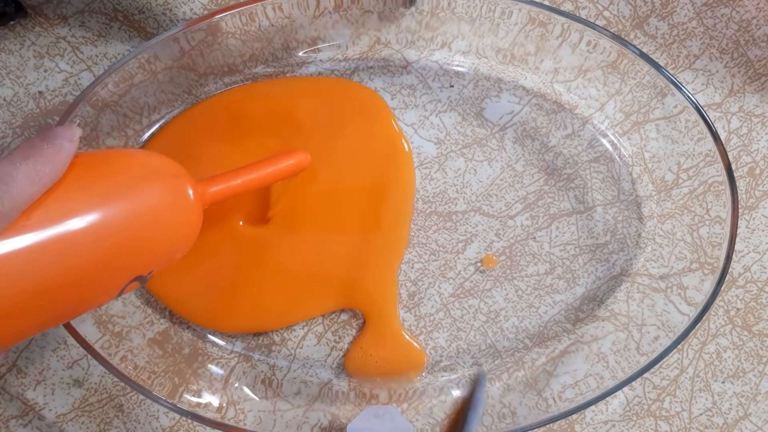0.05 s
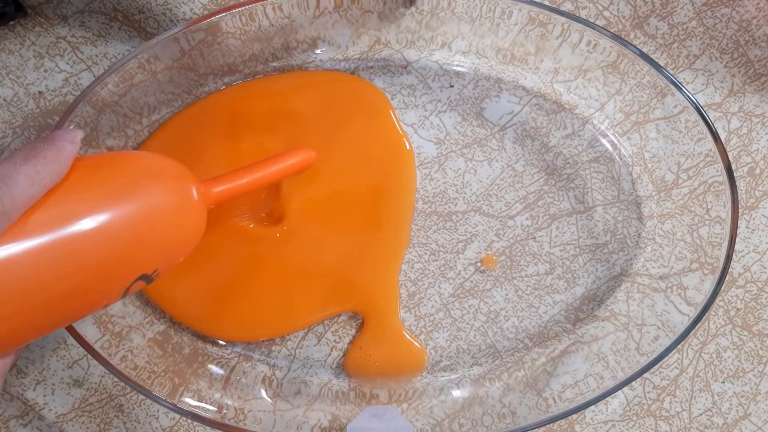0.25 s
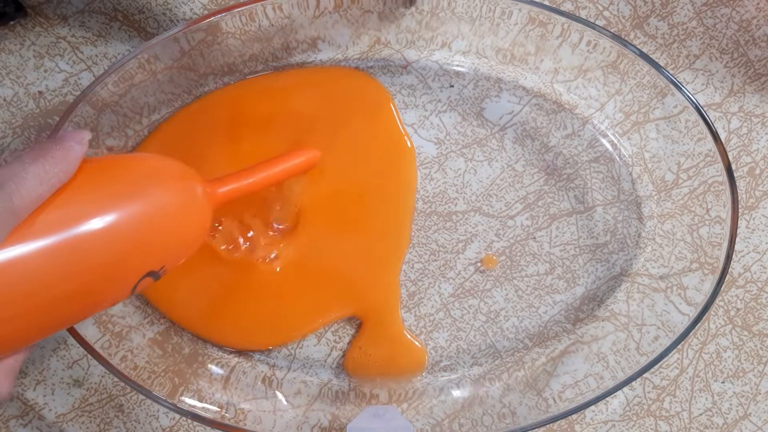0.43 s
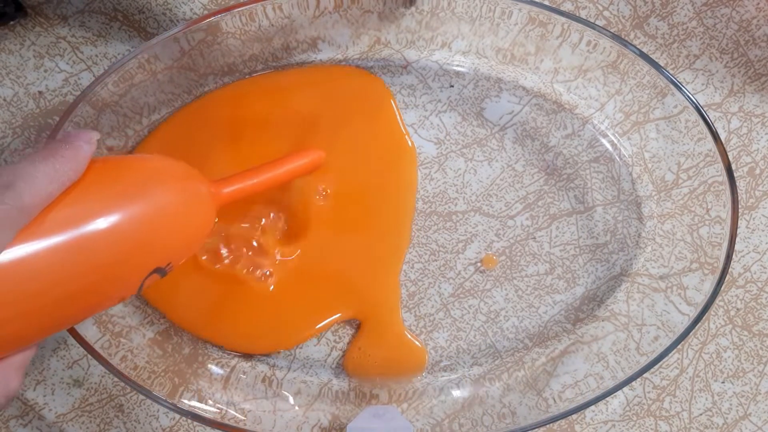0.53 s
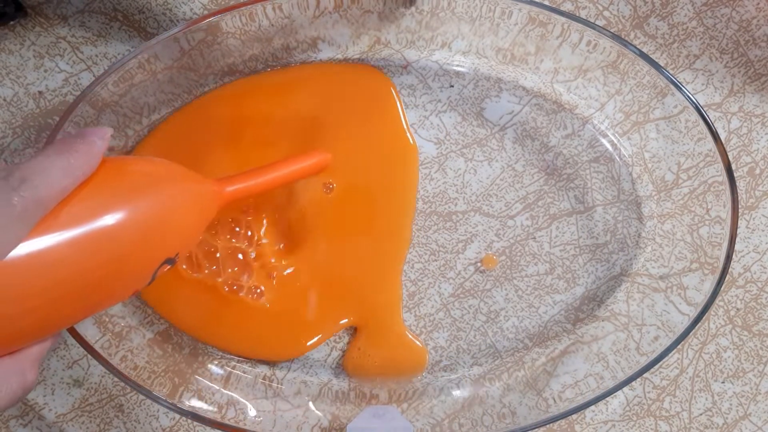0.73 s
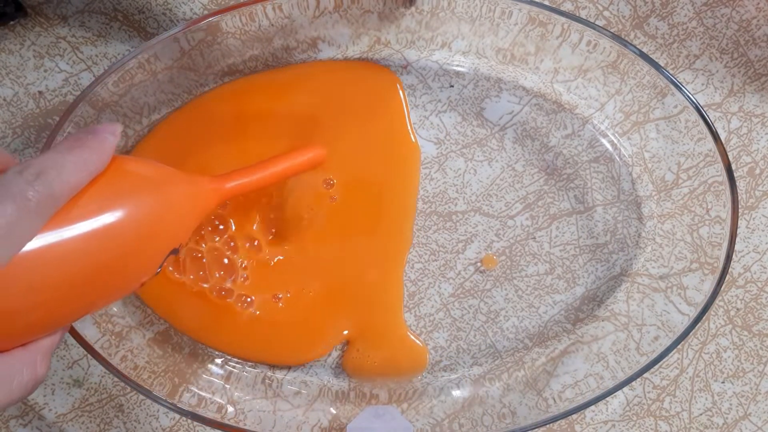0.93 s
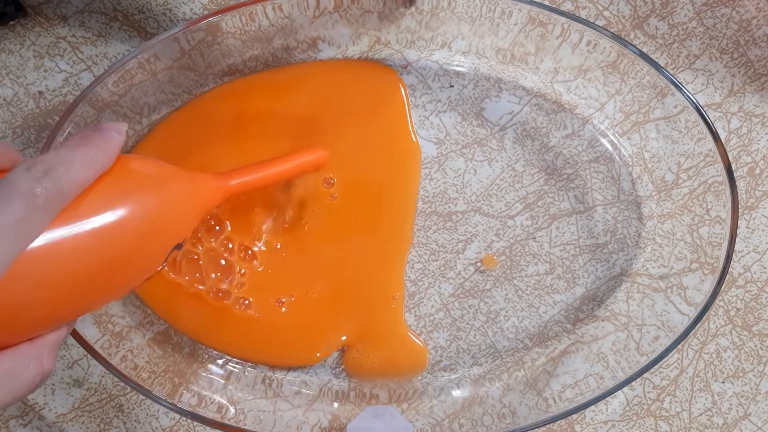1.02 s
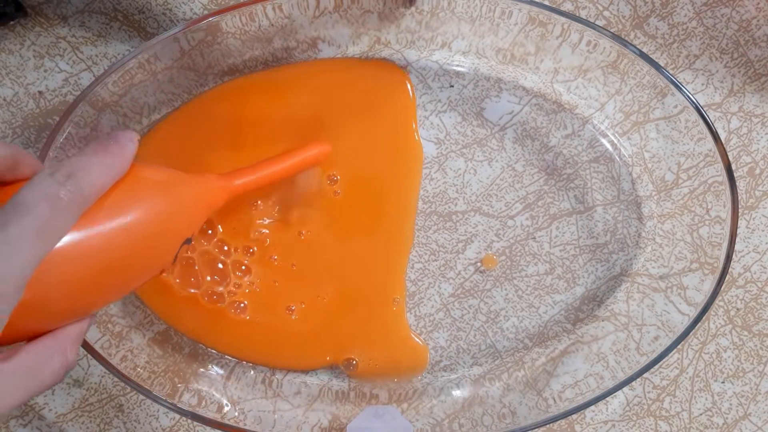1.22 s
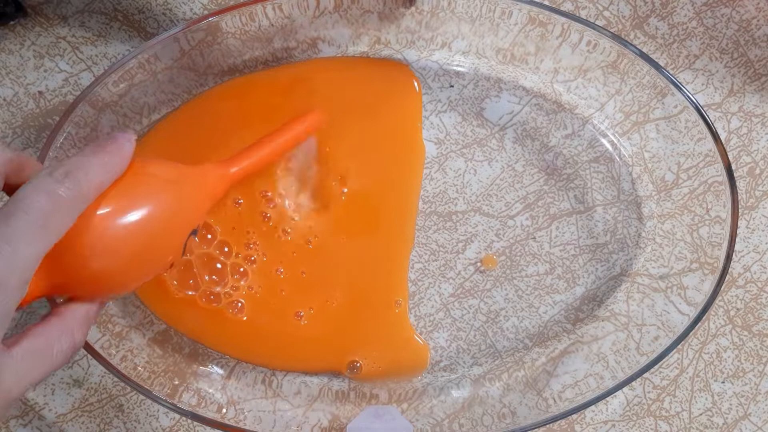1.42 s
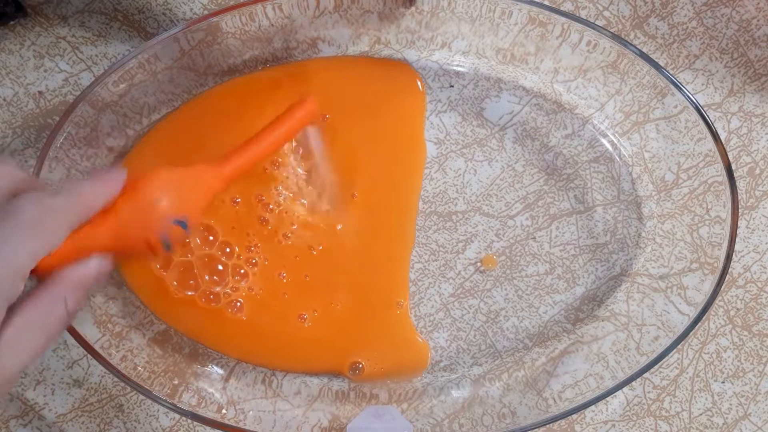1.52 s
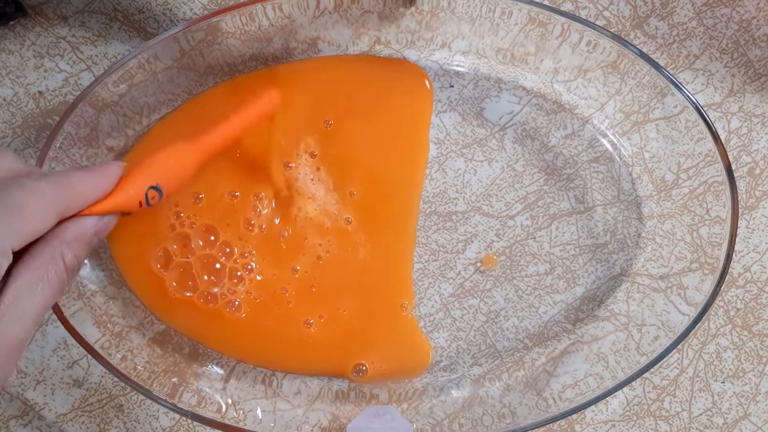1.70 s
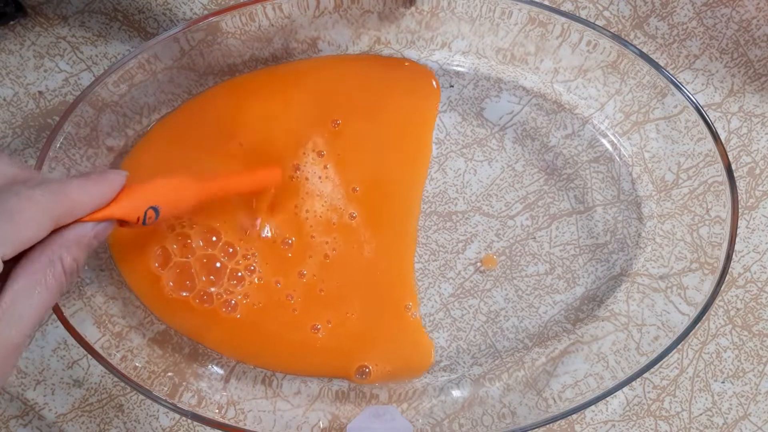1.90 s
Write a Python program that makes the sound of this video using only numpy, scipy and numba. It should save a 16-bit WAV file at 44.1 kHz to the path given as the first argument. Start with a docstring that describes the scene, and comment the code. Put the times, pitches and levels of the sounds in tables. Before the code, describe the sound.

A wet sputtering squirt of air and slime comes from a squeezed balloon. Small bubbles chirp and pop, the sputter builds to a crackling hiss, and a last squelch follows, close to the microphone in a small room.

```python
"""Single bubbles break with rising chirps, close to the microphone in a small room: air and runny slime
are being squeezed from a balloon into a glass dish. The outlet sputters as puffs sound the cavity in the
slime and films snap; one puff hits the microphone. The sputter merges into a crackling hiss, the balloon
runs empty in a bright spray, and a last squelch follows."""
import sys
import numpy as np
from scipy import signal
from scipy.fft import rfft, irfft, next_fast_len
from scipy.io import wavfile
from scipy.ndimage import map_coordinates
from numba import njit

SR = 44100
rng = np.random.default_rng(int(sys.argv[2]) if len(sys.argv) > 2 else 0)


def master_out(mix):
    """Clip the mix to full scale and print it as 16-bit PCM to the path in sys.argv[1]."""
    frames = np.transpose(np.atleast_2d(mix))
    ceiling = np.clip(frames, -1, 1)
    pcm = np.round(ceiling * 32767).astype(np.int16)
    wavfile.write(sys.argv[1], SR, pcm)


N = 85995


def bubbles():
    """As a bubble's hole widens its pitch shoots up; the tearing film roughens it."""
    # bubbles breaking open: t/s, length/s, start f/Hz, end f/Hz, level/dB
    breaks = [(.007, 0.0049, 7400, 10700, -39), (0.067, 0.0061, 4970, 10260, -33),
              (0.122, 0.0049, 7500, 10500, -41.5), (0.133, 0.0043, 4980, 6180, -33),
              (0.149, 0.003, 6900, 9400, -31.5), (0.157, 0.0035, 4570, 6560, -29.5),
              (0.185, 0.0057, 2460, 6340, -31), (0.202, 0.0038, 4680, 7350, -24.5),
              (0.205, 0.0051, 3240, 6100, -25.5), (0.225, 0.007, 2500, 6300, -26),
              (0.244, 0.0024, 3630, 5560, -18.5), (0.251, 0.0098, 1154, 5160, -22),
              (0.273, .011, 1501, 5500, -20), (0.299, 0.0077, 1268, 3310, -17),
              (0.306, 0.0038, 3730, 7870, -17), (0.328, 0.0093, 1265, 3810, -18.5),
              (0.333, 0.0066, 4060, 6680, -15), (0.353, 0.012, 1020, 2950, -21.5),
              (0.3672, 0.0073, 4960, 5960, -20.5), (0.385, 0.0072, 1730, 3860, -16.5),
              (0.3906, 0.0056, 4310, 5860, -13.5), (0.405, 0.011, 1410, 2270, -21.5),
              (0.424, 0.0043, 4540, 5950, -22), (0.441, 0.013, 1591, 1876, -22),
              (0.496, 0.0051, 5600, 7100, -31), (0.577, 0.0078, 2687, 2870, -12.5),
              (0.729, .010, 2827, 2918, -19.5), (0.733, 0.0025, 5300, 6350, -38),
              (0.952, 0.0025, 7530, 8900, -21), (1.114, 0.0031, 3480, 4670, -21),
              (1.151, 0.003, 3280, 4270, -17), (1.203, 0.0061, 4320, 6350, -18.5),
              (1.248, 0.0062, 2630, 3960, -24), (1.302, 0.0043, 2910, 4300, -16.5),
              (1.356, 0.0052, 2880, 4240, -14), (1.522, 0.0071, 4370, 5130, -17),
              (1.64, 0.0075, 1965, 2680, -20.5), (1.6456, 0.0086, 3310, 4084, -19),
              (1.667, 0.012, 2430, 3400, -33), (1.69, 0.0049, 3040, 4280, -22.5)]
    # spray off the film: f/Hz, level/dB
    spray_spectrum = [(300, -32), (620, -16), (900, 5), (1400, 1.5), (2300, 5), (3000, -2.5), (3900, 9.5),
                      (4600, -4), (5500, 3.5), (7000, -11), (9500, -8), (16000, -14.5)]
    out, size = np.zeros((2, N)), 2048
    t = np.arange(size) / SR
    rough_per_s, gulp_below_hz, clean_above_hz = 1400, 1500, 3120
    for s, length, start_hz, end_hz, db in breaks:
        progress = t / length
        pitch = start_hz * (end_hz / start_hz) ** np.minimum(progress, 1)
        phase = 2 * np.pi * np.cumsum(pitch * (1 + .045 * wobble(rough_per_s, size))) / SR
        # small, high bubbles and those that hardly change pitch ring cleaner
        ragged = np.clip(np.log2(end_hz / start_hz) / .35, .15, 1)
        ragged /= 1 + (start_hz / clean_above_hz) ** 2
        rough = .85 * np.sqrt(ragged) * (wobble(rough_per_s, size) + 1j * wobble(rough_per_s, size))
        tone = unit(((1 + rough) * np.exp(1j * phase)).imag)
        spray = colour(noise_band(size, np.sqrt(start_hz * end_hz), octaves=.8), spray_spectrum)
        gulp = (start_hz < gulp_below_hz) * noise_band(size, centre_hz=1100, octaves=.22)
        shape = np.interp(progress, [0, .08, .49, 1, 1.25], [.14, .029, .74, .45, .029])
        add(out, s, amp(db) * shape * unit(tone + amp(-9) * gulp + amp(2) * ragged * spray))
    return out


def snaps():
    """Each slime film tears with a short broad spit, brightened around its own pitch."""
    # films snapping: t/s, level/dB, ring f/Hz, rise/s
    films = [(.013, -34, 9670, 0.0011), (.024, -46, 9800, 0.00047), (.034, -30.5, 9600, 0.00068),
             (0.051, -43, 8800, 0.00063), (.135, -28, 9000, 0.001), (0.159, -33, 12500, .001),
             (.168, -29.5, 9750, .0013), (.217, -29.5, 9500, .0018), (.244, -26, 9900, 0.00084),
             (0.2628, -21.5, 12800, 0.0005), (0.282, -32, 12200, .001), (0.445, -21, 8500, 0.0015),
             (.466, -11, 8900, 0.001), (.487, -16, 9600, 0.0014), (0.5232, -20, 8210, .002),
             (0.543, -12, 9600, 0.0016), (0.559, -17, 8740, 0.0012), (.577, -10, 5570, 0.0023),
             (.5834, -13, 10100, 0.00099), (.598, -17, 8750, 0.0017), (.6085, -24.5, 10700, 0.0017),
             (0.634, -19, 10570, 0.0019), (0.6553, -16.5, 9280, .0015), (0.6692, -13, 8540, 0.0021),
             (0.691, -27, 9470, 0.0016), (0.711, -16, 8440, .0015), (.7357, -7, 5800, 0.0014),
             (0.752, -15, 8700, 0.0018), (0.79, -15.5, 8300, .0015), (.811, -24, 7840, 0.0021),
             (0.833, -15.5, 8000, 0.0016), (.852, -22.5, 9170, 0.0017), (.873, -15.5, 7700, 0.0018),
             (0.8936, -15, 8000, 0.0018), (0.9128, -20, 6200, 0.0018), (.952, -13, 8660, .0009),
             (0.9767, -17, 4870, .0018), (.996, -22, 9450, 0.0023), (1.023, -17.5, 5000, .0012),
             (1.065, -10, 5300, 0.0012), (1.1038, -17, 4300, 0.0018), (1.1506, -18.5, 7660, 0.0016),
             (1.175, -15.5, 5500, 0.0026), (1.206, -14.5, 5730, .0012), (1.2534, -12.5, 4600, 0.0015),
             (1.26, -11.5, 12700, 0.0014), (1.3022, -12, 4220, 0.00083), (1.3123, -13, 13900, 0.00097),
             (1.4, -12.5, 4500, 0.00098), (1.418, -14.5, 4200, .001), (1.434, -12, 8270, .0012),
             (1.456, -13, 7700, 0.0011), (1.763, -45.5, 7500, 0.0012), (1.808, -53, 5800, .001),
             (1.928, -55, 7000, .0008)]
    # colour common to all snaps: f/Hz, level/dB
    spectrum = [(500, -14), (2500, -21), (4200, -4), (5700, 4), (7000, -3), (8800, 2), (12000, 1),
                (16000, -3.5)]
    out, size = np.zeros((2, N)), 2048
    t = np.arange(size) / SR
    for s, db, ring_hz, rise_s in films:
        spit = filtered(rng.standard_normal(size), lambda hz: amp(9.5 * hump(hz, ring_hz, octaves=.15)))
        add(out, s, amp(db - 8.5) * swell(t, rise_s, sharpness=1.19) * colour(spit, spectrum))
    return out


def outlet_air():
    """Puffs and a fluttering jet sound the cavity in the slime, which shrinks as the balloon empties."""
    # cavity resonances: t/s, second f/Hz, third f/Hz, third against second in steady flow/dB
    resonances = [(.4, 1620, 2726, 2), (.6, 1817, 2775, -1), (.75, 1900, 2770, -7.5), (.9, 2010, 3080, -15),
                  (1.1, 2196, 3004, -5.5), (1.3, 2390, 2990, 0), (1.4, 2530, 3160, 3.5),
                  (1.5, 2700, 3120, 1.5)]
    # depth of the flutter: t/s, share
    flutter_depth = [(1.0, 1), (1.25, .7), (1.4, 1)]
    flutter = unit(amp(3.5 * curves(flutter_depth)[0] * np.minimum(wobble(per_s=130), 1.5)))
    second_hz, third_hz, third_db = curves(resonances)
    wander = 1 + .028 * wobble(per_s=45)
    second = resonance(second_hz * wander, width_hz=420)
    third = resonance(third_hz * wander, width_hz=470)

    def cavity(db):
        """Both resonances at constant power, the third db above the second."""
        return (second + amp(db) * third) / np.hypot(1, amp(db))

    sputter, puff_envelope = puffs(cavity)
    return sputter + hollow(flutter, puff_envelope) + flutter * (gurgle() + jet(cavity(third_db)))


def puffs(cavity):
    """Each puff colours the cavity in its own way; returns the sound and the summed envelope."""
    # puffs through the slime: t/s, level/dB, third resonance against second/dB
    events = [(0.466, -21.5, 10), (0.482, -20, -11.5), (.523, -18, -5.5), (0.5398, -21, -2),
              (0.56, -18.5, -3), (0.578, -14.5, 4.5), (0.597, -17, -6.5), (0.616, -18, -4),
              (0.634, -16, -5), (.652, -21.5, -6), (0.669, -22.5, -3.5), (.71, -16, -6.5),
              (.731, -16.5, 1.5), (0.7487, -21.5, -4.5), (0.768, -21.5, -0.5), (0.8324, -23, -9),
              (0.853, -17.5, -10), (0.8767, -18.5, -8), (0.895, -17.5, -6.5), (.957, -27, -19),
              (0.975, -22, -15.5), (0.999, -21.5, -10), (1.02, -27.5, -5), (1.065, -26, 1.5),
              (1.112, -23.5, -4.5), (1.171, -17.5, -0.5), (1.252, -17, 2), (1.358, -18, 11),
              (1.418, -13.5, 1), (1.436, -19.5, 2), (1.455, -17, 3.5)]
    t = np.arange(N) / SR
    sound, envelope = np.zeros((2, N)), np.zeros(N)
    for s, db, third_db in events:
        shape = amp(db - 10) * swell(t - s, peak_s=.0033, sharpness=.92)
        sound += shape * cavity(third_db)
        envelope += shape
    return sound, envelope


def jet(cavity_ring):
    """Steady air grows to a crackling hiss with the cavity ringing in it, then runs out."""
    # air flow: t/s, body level/dB, fizz level/dB
    flow = [(0, -80, -90), (.14, -64, -55), (.3, -40.5, -44), (.43, -38, -50), (.6, -38, -43.5),
            (.82, -39.5, -44), (.94, -42, -50), (1.05, -32.5, -35), (1.24, -30.5, -34), (1.35, -25, -27),
            (1.4, -23.5, -26.5), (1.455, -25, -24), (1.49, -31.5, -28), (1.535, -31, -26),
            (1.572, -45, -46.5), (1.63, -52, -52.5), (1.75, -82.5, -75.5)]
    # midrange body of the jet: f/Hz, level/dB
    body_spectrum = [(250, -28.5), (550, 0.5), (800, 0), (1300, 1), (1700, 4.5), (2400, 6.5), (3100, 3.5),
                     (3500, 3), (4000, 6.5), (4700, -2.5), (6500, -8)]
    # its treble fizz: f/Hz, level/dB
    fizz_spectrum = [(2500, -31), (4500, -5.5), (5700, 0), (7000, -5), (8500, -6), (11000, -8),
                     (16000, -12.5)]
    body_gain, fizz_gain = amp(curves(flow))
    body = colour(crackle(), body_spectrum) + amp(-5) * cavity_ring
    return body_gain * body + fizz_gain * colour(crackle(), fizz_spectrum)


def hollow(flutter, puff_envelope):
    """The cavity's lowest resonance, driven by flow and puffs; it rings clearest in the full jet."""
    # its pitch: t/s, f/Hz
    pitch = [(.3, 937), (.9, 963), (1.25, 930), (1.35, 878), (1.39, 894), (1.44, 975), (1.48, 962),
             (1.53, 1020)]
    # its damping: t/s, bandwidth/Hz
    width = [(1.22, 230), (1.32, 110), (1.45, 110), (1.49, 380)]
    # drive from the flow: t/s, level/dB
    level = [(.22, -59), (.3, -58), (.6, -38.5), (1.0, -36.5), (1.2, -32.5), (1.3, -27), (1.345, -18),
             (1.39, -24.5), (1.44, -20.5), (1.52, -30), (1.57, -44.5), (1.65, -71), (1.8, -94)]
    drive = amp(curves(level)[0] - 4) * flutter + amp(-15) * puff_envelope
    return drive * resonance(curves(pitch)[0], curves(width)[0])


def pop():
    """A bursting bubble ticks; its puff hits the microphone, harder on the right, and leaves a low tail."""
    t = np.arange(N) / SR - .7768
    swing_s, tick_s, tick_hz, tail_hz = .00041, .00031, 8570, 96
    u = t / swing_s
    pressure_swing = amp(-9) * 2 * u / (1 + u ** 2) ** 1.87
    tail = amp(-45) * burst(t, rise_s=.000955, decay_s=.009) * np.sin(2 * np.pi * tail_hz * t)
    tick = amp(-2.5) * np.exp(-np.abs(t) / tick_s) * np.sin(2 * np.pi * tick_hz * t) * np.ones((2, 1))
    return (pressure_swing + tail) * amp([[-8], [2]]) + tick + reflections(tick) / 2


def mist():
    """The last slime is blown to a bright spray as the balloon runs empty."""
    # rise and fall of the spray: t/s, level/dB
    level = [(1.38, -56), (1.435, -28.5), (1.47, -28.5), (1.495, -30.5), (1.525, -30), (1.57, -61),
             (1.65, -92)]
    # its colour: f/Hz, level/dB
    spectrum = [(2500, -20), (4600, -7), (6000, -2), (8500, 5), (11000, -11), (16000, -19.5)]
    return amp(curves(level)[0]) * colour(crackle(), spectrum)


def foam():
    """Many small bubbles of the froth burst between the larger snaps."""
    out, size = np.zeros((2, N)), 512
    start_s, span_s, per_s = .43, .77, 90
    shape = swell(np.arange(size) / SR, peak_s=.00051, sharpness=1.2)
    for when, loud, high in rng.random((int(per_s * span_s), 3)):
        spit = noise_band(size, centre_hz=8500 * 2 ** (2 * high - 1), octaves=.3)
        add(out, start_s + when * span_s, amp(-36 + 10 * loud) * shape * spit)
    return out


def gurgle():
    """A low gurgle under the escaping air."""
    # rise and fall of the gurgle: t/s, level/dB
    level = [(.1, -67.5), (.35, -57.5), (.6, -46.5), (.92, -47.5), (1.12, -45), (1.45, -49.5), (1.54, -53),
             (1.68, -71)]
    # its colour: f/Hz, level/dB
    spectrum = [(25, -42), (60, -24.5), (110, -4.5), (300, 5), (600, -3), (900, -12.5), (1800, -37.5)]
    return amp(curves(level)[0] - .5) * colour(crackle(), spectrum)


def reflections(x):
    """The glass dish answers at once, the small room with a short tail."""
    # room decay: f/Hz, time to fall 60 dB/s
    decay = [(100, 0.13), (800, 0.53), (2400, 0.48), (3100, .33), (3900, 0.42), (5000, .24), (7000, 0.27),
             (15000, 0.3)]
    # echo off the dish: f/Hz, level/dB
    dish_spectrum = [(100, -6), (600, 1), (2500, 4.5), (5000, -2), (9000, -4.5), (16000, -4.5)]
    hz, frame_s, frames = signal.stft(rng.standard_normal((2, SR // 2)), SR, nperseg=256)
    room = signal.istft(frames * amp(-60 * frame_s / along(decay, hz)[:, None]), SR, nperseg=256)[1]
    t = np.arange(room.shape[1]) / SR
    dish = colour(rng.standard_normal(room.shape), dish_spectrum)
    dish *= burst(t - .0004, rise_s=.0001, decay_s=.0072)
    answer = amp(-8.5) * room / np.linalg.norm(room[0]) + amp(-6.5) * dish / np.linalg.norm(dish[0])
    return signal.fftconvolve(x, answer, axes=1)[:, :N]


def room_tone():
    """Quiet, steady noise of the room."""
    # noise floor: f/Hz, level/dB
    spectrum = [(25, -15), (60, -15), (160, 4.5), (400, -12.5), (780, 4.5), (1200, -12.5), (4000, -15),
                (16000, -38)]
    return amp(-64.5) * colour(spread(rng.standard_normal((2, N))), spectrum)


def crackle(grains_per_s=1500, grain_share=.54):
    """Stereo rush of air dotted with tiny bursts of foam."""
    hits = rng.random(N) < grains_per_s / SR
    strength = amp(4.5 * np.clip(rng.standard_normal(N), -2, 1.2))
    grains = unit(hits * strength * rng.uniform(-1.02, 1, (2, N)))
    rush = rng.standard_normal((2, N))
    return spread(np.sqrt(grain_share) * grains + np.sqrt(1 - grain_share) * rush)


def resonance(hz, width_hz):
    """Crackling air through a steep moving resonance, rms 1."""
    poles = np.exp(np.pi * (2j * hz - width_hz) / SR)
    drive = crackle() * width_hz ** 1.5
    return unit(np.array([ring(np.diff(ring(x, poles), prepend=0), poles) for x in drive]))


@njit
def ring(x, poles):
    """A resonator whose pole moves."""
    y, z = np.zeros(len(x)), 0j
    for i in range(len(x)):
        z = z * poles[i] + x[i]
        y[i] = z.imag
    return y


def amp(db):
    """Decibels to gain."""
    return 10 ** (np.asarray(db) / 20)


def unit(x):
    """Scale to rms 1."""
    return x / np.sqrt(np.mean(x ** 2) + 1e-20)


def along(points, hz):
    """Interpolate (f/Hz, value) points on a log axis."""
    f, values = np.transpose(points)
    return np.interp(np.log(hz + 1), np.log(f + 1), values)


def curves(rows):
    """One value per sample for each column after the time."""
    s, *columns = np.transpose(rows)
    return [np.interp(np.arange(N) / SR, s, column) for column in columns]


def wobble(per_s, size=N):
    """A smooth random curve with per_s knots a second."""
    return map_coordinates(rng.standard_normal(size // 4), [np.arange(size) * per_s / SR], mode="wrap")


def filtered(x, response):
    """Filter x by a function of frequency."""
    n = x.shape[-1]
    padded = next_fast_len(n + 2048)
    return irfft(rfft(x, padded) * response(np.fft.rfftfreq(padded, 1 / SR)), padded)[..., :n]


def colour(x, spectrum):
    """x shaped by a spectrum, at rms 1."""
    return unit(filtered(x, lambda hz: amp(along(spectrum, hz))))


def hump(hz, centre_hz, octaves):
    """A bell curve on a log axis."""
    return np.exp(-.5 * (np.log2((hz + 1) / centre_hz) / octaves) ** 2)


def noise_band(size, centre_hz, octaves):
    """A bell-shaped band of noise, rms 1."""
    return unit(filtered(rng.standard_normal(size), lambda hz: hump(hz, centre_hz, octaves)))


def burst(t, rise_s, decay_s):
    """Quick rise and exponential fall, peak 1."""
    t = np.maximum(t, 0)
    shape = (1 - np.exp(-t / rise_s)) * np.exp(-t / decay_s)
    return shape / (shape.max() + 1e-12)


def swell(t, peak_s, sharpness):
    """A rounded rise and fall, peak 1 at peak_s."""
    u = np.maximum(t, 0) / peak_s
    return (u * np.exp(1 - u)) ** sharpness


def spread(pair, width=.7):
    """Two unrelated signals as a partly alike left and right."""
    return unit(np.array([pair[0] + width * pair[1], pair[0] - width * pair[1]]))


def add(out, s, x):
    """Place a short sound at time s, reaching the microphone from a slightly random direction."""
    lag_s = rng.normal(0, .00002) * np.array([[.5], [-.5]])
    i = round(s * SR)
    out[:, i:i + len(x)] += filtered(x, lambda hz: np.exp(2j * np.pi * hz * lag_s))[:, :N - i]


def scene():
    """The balloon close to the microphone and a little to the right, over room tone."""
    # the outlet drifts to the middle and back: t/s, left level/dB (the right gets the opposite)
    pan = [(.1, -1.2), (.6, -1.1), (1.05, -1), (1.3, 0), (1.7, -1)]
    direct = bubbles() + snaps() + foam() + outlet_air() + mist()
    direct *= amp(curves(pan)[0] * np.array([[1], [-1]]))
    return room_tone() + direct + reflections(direct) + pop()


def record(dry):
    """The recorder cuts off around its band limit."""
    top_hz = 16300
    return filtered(dry, lambda hz: np.clip((top_hz - hz) / 500 + .5, 0, 1))


dry = scene()
out = record(dry)
master_out(out)
```